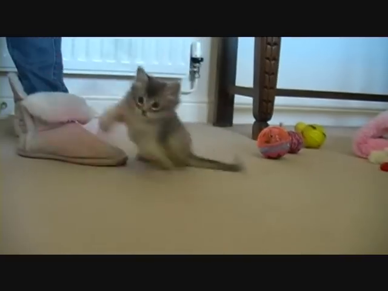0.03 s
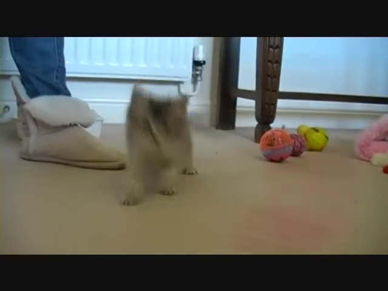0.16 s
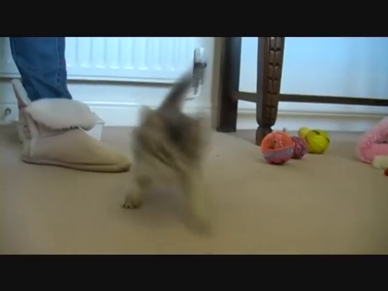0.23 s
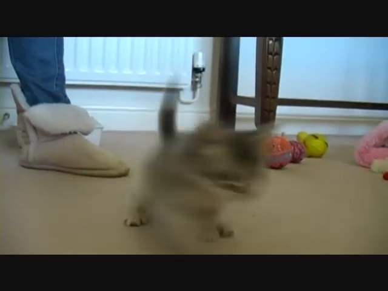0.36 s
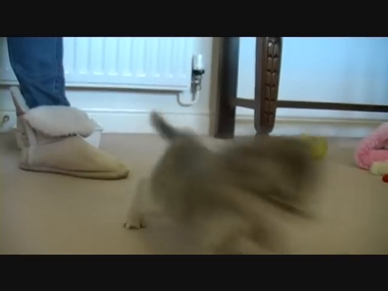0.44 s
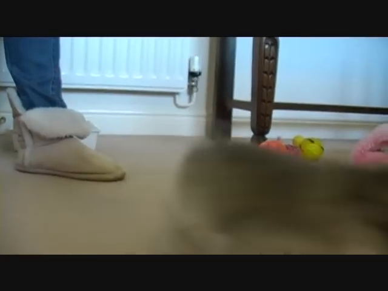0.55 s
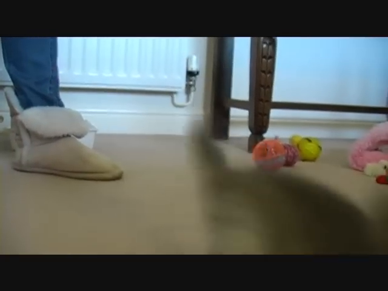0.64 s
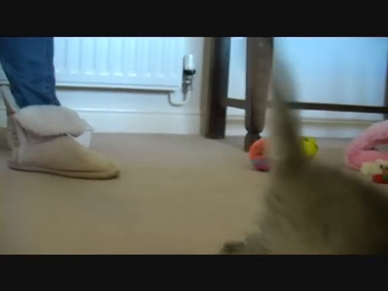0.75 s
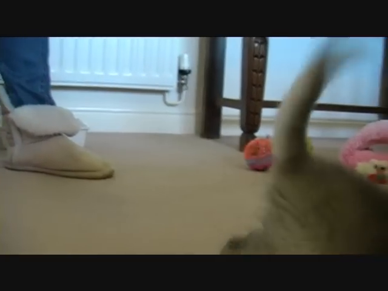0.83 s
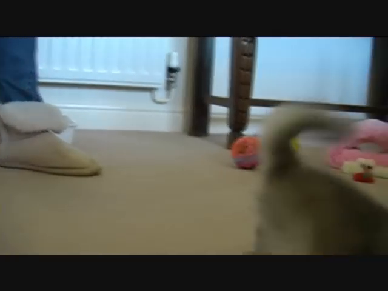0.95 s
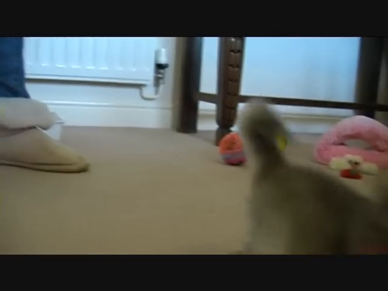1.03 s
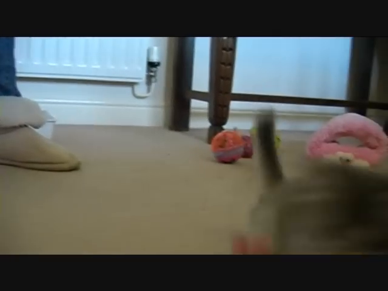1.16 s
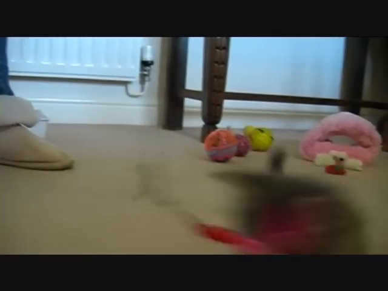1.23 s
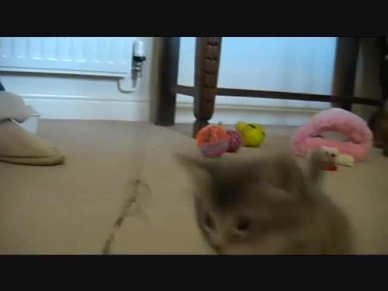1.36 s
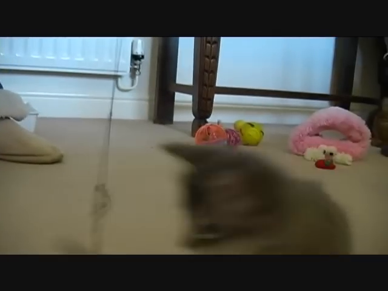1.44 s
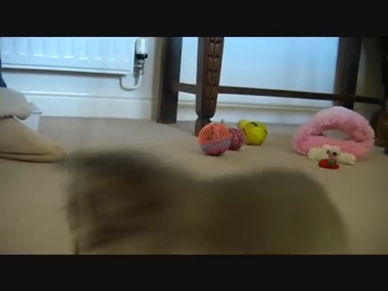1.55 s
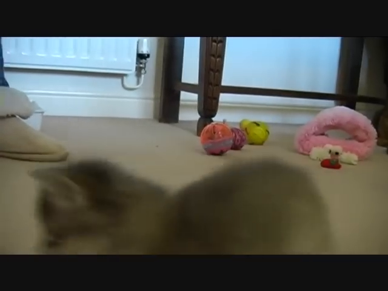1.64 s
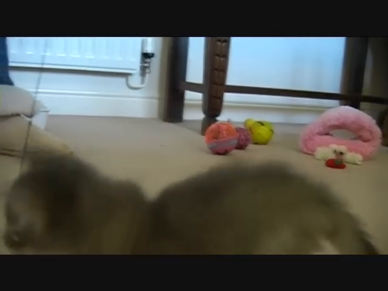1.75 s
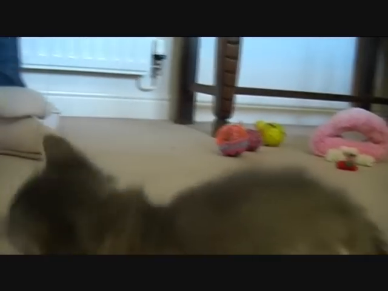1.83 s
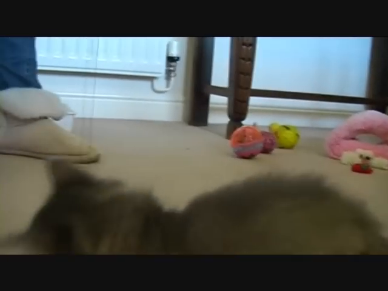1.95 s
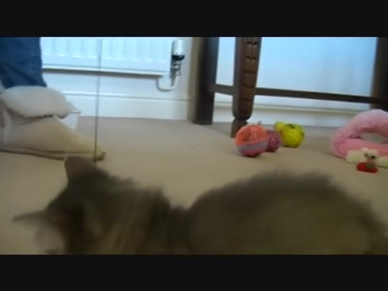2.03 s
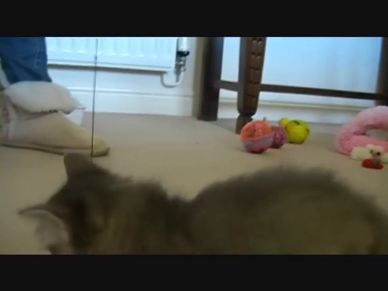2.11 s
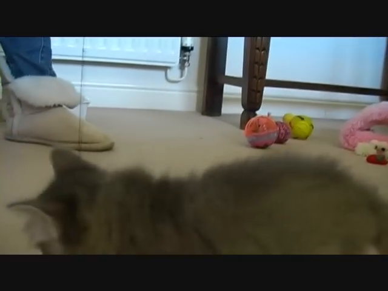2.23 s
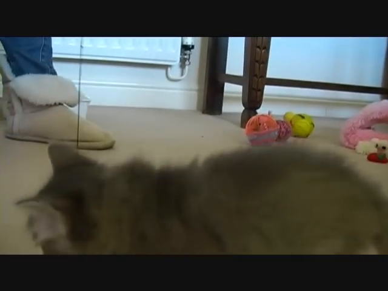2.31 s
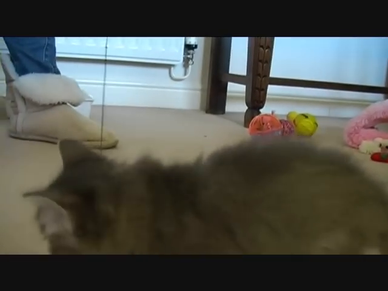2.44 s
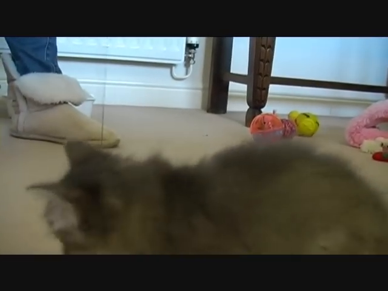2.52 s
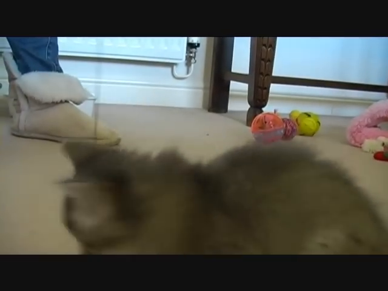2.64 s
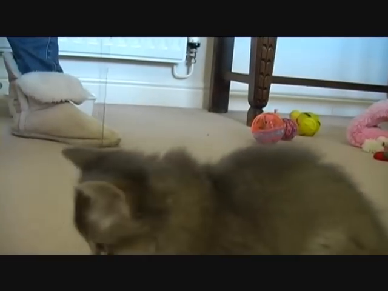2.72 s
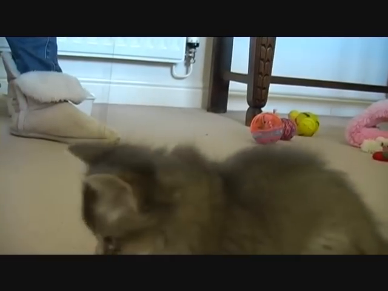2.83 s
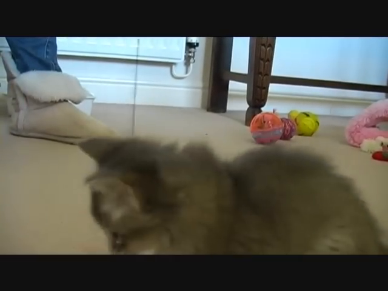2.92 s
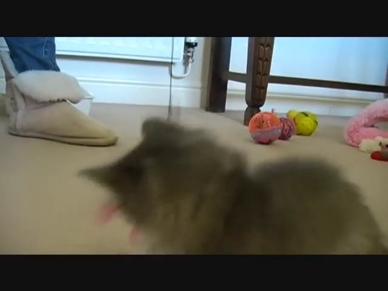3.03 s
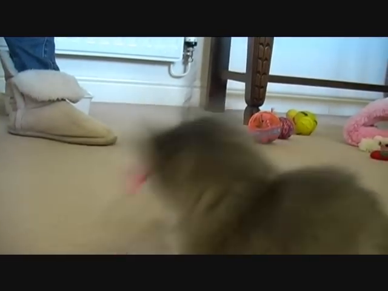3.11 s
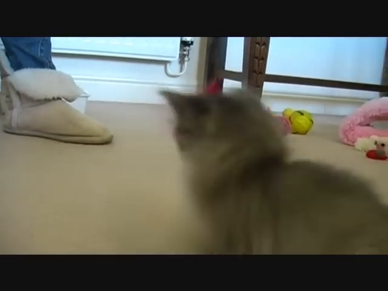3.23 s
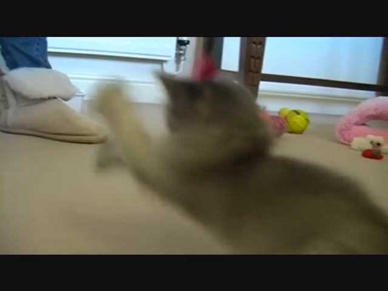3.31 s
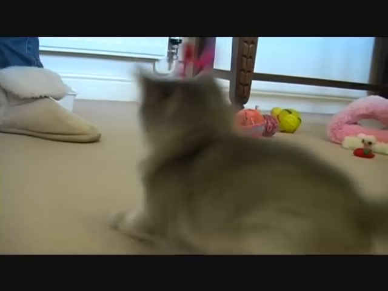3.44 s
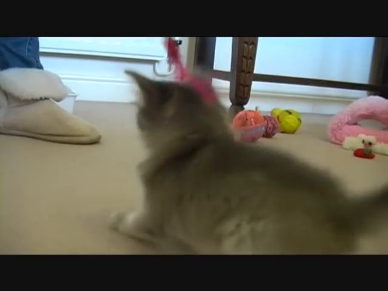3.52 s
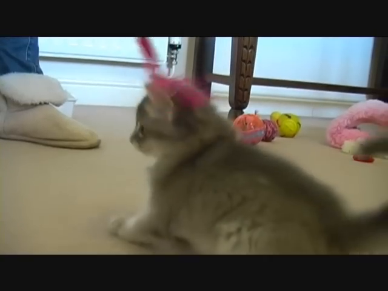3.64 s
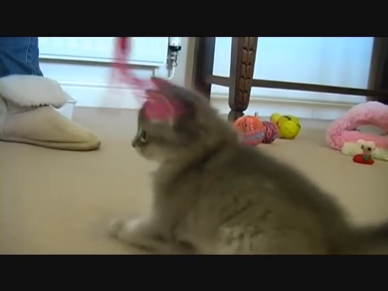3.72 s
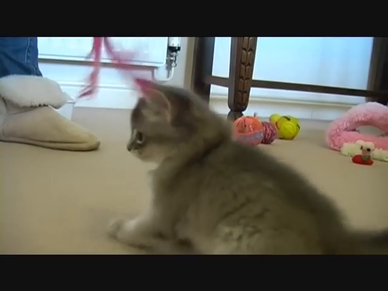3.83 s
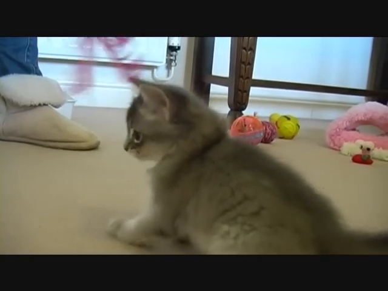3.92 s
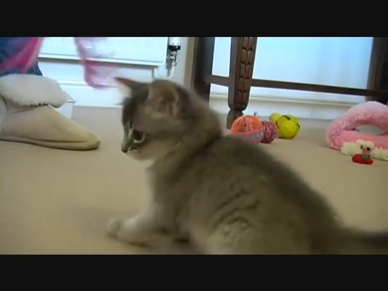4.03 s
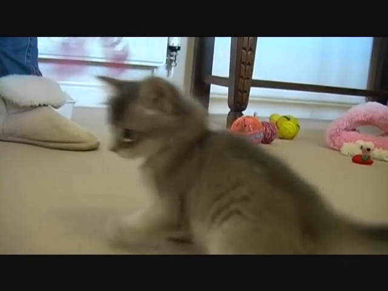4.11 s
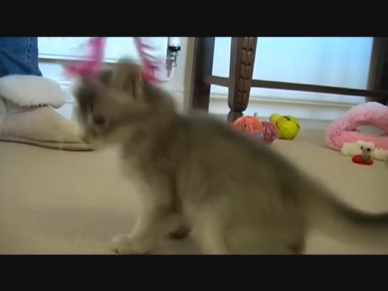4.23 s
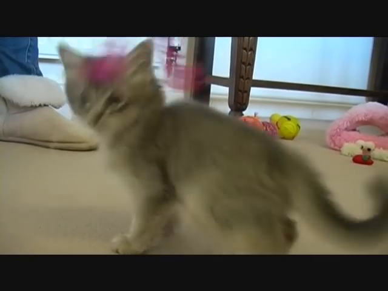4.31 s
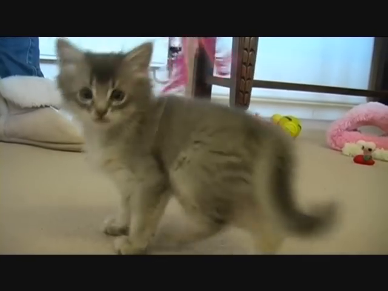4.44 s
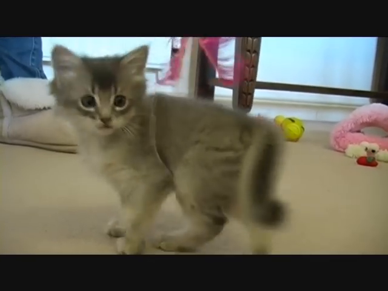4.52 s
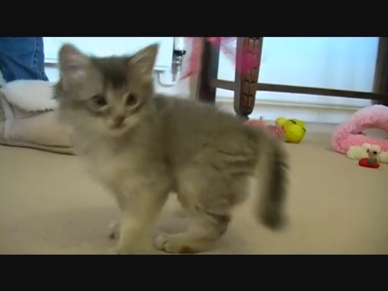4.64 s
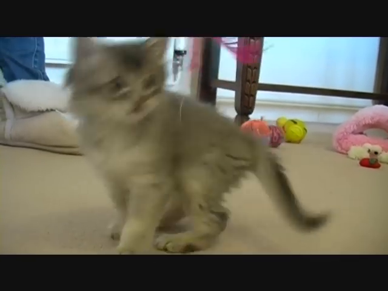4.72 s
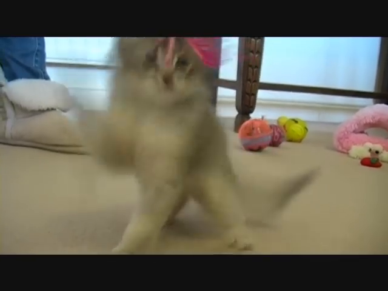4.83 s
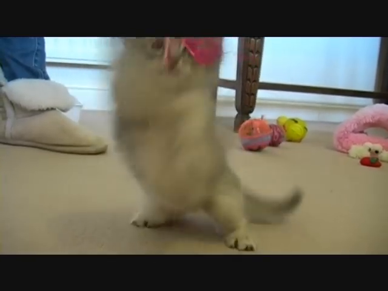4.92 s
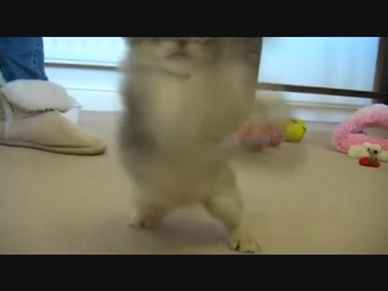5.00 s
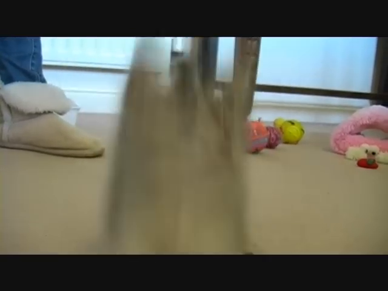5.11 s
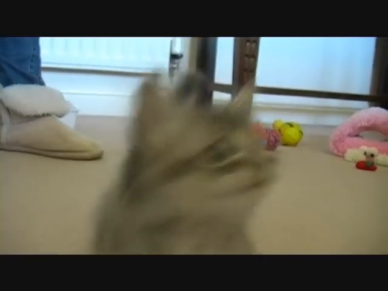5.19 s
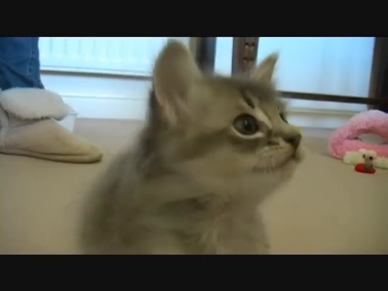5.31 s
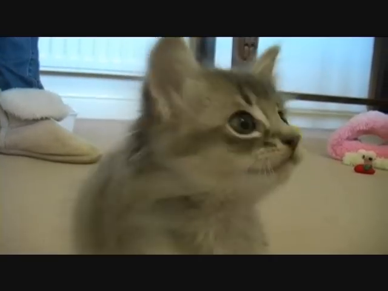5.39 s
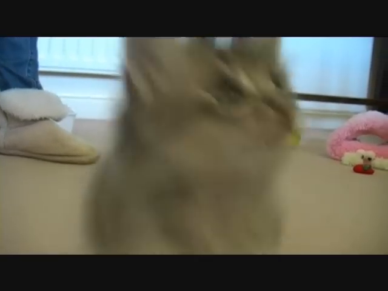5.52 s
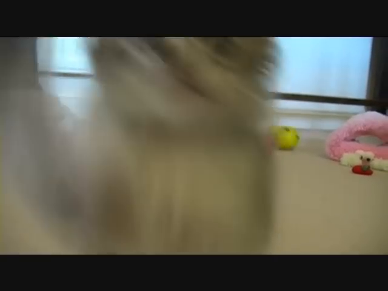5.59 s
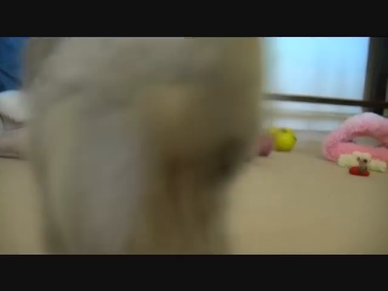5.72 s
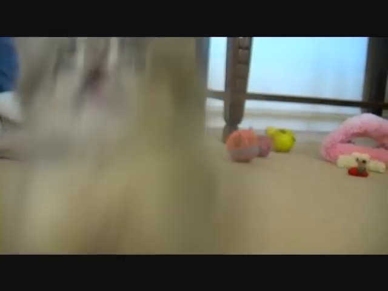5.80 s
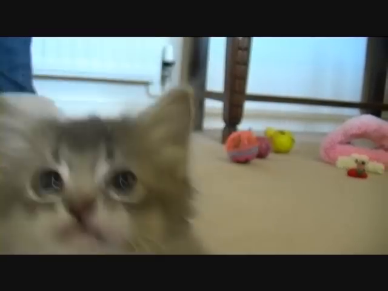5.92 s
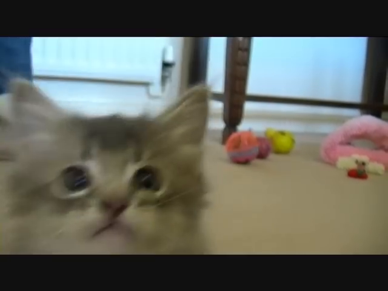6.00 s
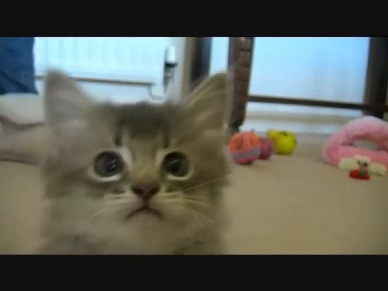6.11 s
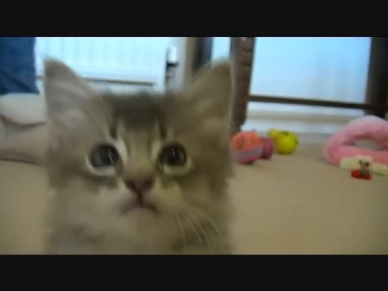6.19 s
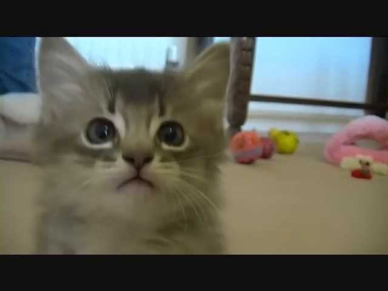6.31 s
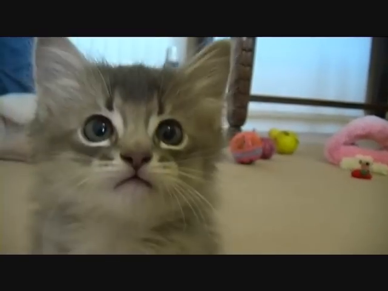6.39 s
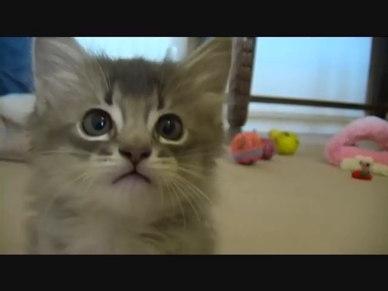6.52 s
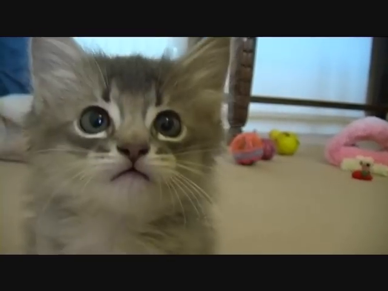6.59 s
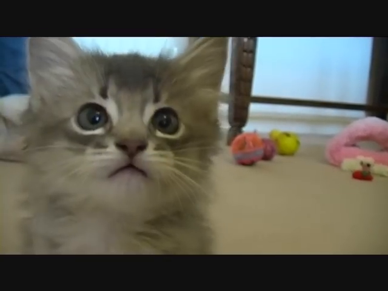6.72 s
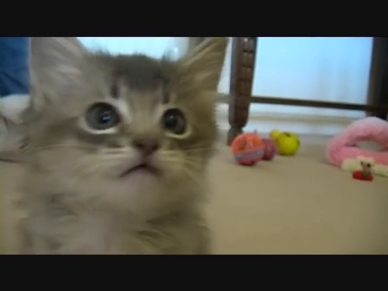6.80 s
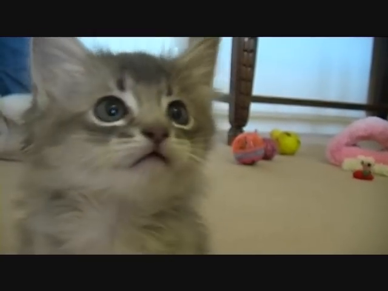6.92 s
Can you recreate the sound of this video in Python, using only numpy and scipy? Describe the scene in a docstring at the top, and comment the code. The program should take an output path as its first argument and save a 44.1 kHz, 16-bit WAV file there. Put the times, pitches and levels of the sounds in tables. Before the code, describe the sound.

A constant low hum around 150 Hz, with thin high whine, soft hiss and a dull room murmur, runs throughout, slightly wider than centre. A faint motor whirr fades just after 0.9 s. From 0.1 to 0.5 s a kitten's paws patter in soft, low thumps on carpeted boards; at 0.7-0.85 s a closer, knockier cluster lands with a short bright scuff. A thump at 1.0 s, light scuffles at 1.3 s, then a thud and rapid tiny ticks at 1.6-1.7 s. Fur rustles until about 2.3 s. It quietens, with a dull brush near 3.0 s and one firm thud at 3.5 s. Rustling returns at 4.0 s. A landing at 4.95 s, a crisp loud tick at 5.02 s, and the heaviest double thump at 5.2 s follow. Scuffs and ticks come at 5.6-5.9 s, a solid knock at 5.94 s, slight brushing to 6.2 s, then only hum and hiss.

```python
"""Kitten at play on carpet

A kitten pounces and scampers on a carpeted wooden floor, right in front of a camcorder standing on it.
Damped modes make the paws' thumps, and shaped noise the scuffs, the fur's rustle and the shaking.
Claws and a toy on a string tick as short rings and cracks; a small room echoes ticks and landings.
The camcorder's tape drum hums and whines in sine tones over soft filtered hiss and a low murmur.
"""
import sys
import numpy as np
from scipy import signal
from scipy.fft import rfft, irfft, next_fast_len
from scipy.io import wavfile
from scipy.ndimage import map_coordinates

SR = 44100
rng = np.random.default_rng(int(sys.argv[2]) if len(sys.argv) > 2 else 0)


def output_pcm(signal):
    """Save a mono or channel-first signal as 16-bit PCM at the path in sys.argv[1].

    Samples are clipped to [-1, 1] before scaling.
    """
    pcm = np.clip(np.atleast_2d(signal).T, -1, 1) * 32767
    wavfile.write(sys.argv[1], SR, np.round(pcm).astype(np.int16))


N = 306495  # length in samples


def amp(db):
    """Level law: decibels to amplitude gain."""
    return 10 ** (np.asarray(db) / 20)


def unit(x):
    """Normalisation: scale to rms 1."""
    return x / np.sqrt(np.mean(x ** 2) + 1e-20)


def along(points, hz):
    """Logarithmic pitch scale: interpolate (Hz, value) points on a log-frequency axis."""
    f, v = np.transpose(points)
    return np.interp(np.log(hz + 1), np.log(f), v)


def curve(rows):
    """Linear interpolation: (s, value) rows to one value a sample."""
    return np.interp(np.arange(N) / SR, *np.transpose(rows))


def wobble(rate):
    """Slow random modulation: a smooth curve through random knots, rate of them a second."""
    knots = rng.standard_normal(int(N * rate / SR) + 4)
    return map_coordinates(knots, [np.arange(N) * rate / SR])


def filtered(x, response):
    """Linear filtering: multiply the spectrum of x by a response of frequency."""
    m = next_fast_len(N + SR // 2)
    return irfft(rfft(x, m) * response(np.fft.rfftfreq(m, 1 / SR)), m)[..., :N]


def noise(spectrum, alike):
    """Partial coherence: stereo noise of rms 1 whose mid and side shares set the left-right likeness."""
    def mid_side_response(hz):
        turn = np.arccos(np.clip(along(alike, hz), -1, 1)) / 2
        return amp(along(spectrum, hz)) * [np.cos(turn), np.sin(turn)]

    mid, side = filtered(rng.standard_normal((2, N)), mid_side_response)
    return unit(np.array([mid + side, mid - side]))


def add(track, s, sound):
    """Superposition: mix a sound into a track from time s on."""
    part = track[..., round(s * SR):][..., :sound.shape[-1]]
    part += sound[..., :part.shape[-1]]


def swell(t, peak):
    """Impulse envelope: reaches 1 at the peak time and then dies away."""
    return t / peak * np.exp(1 - t / peak)


def held(start, end, rise, fade):
    """Sustained envelope: rises linearly at the start, holds, and decays exponentially after the end."""
    t = np.arange(N) / SR
    return np.clip((t - start) / rise, 0, 1) * np.exp(-np.maximum(t - end, 0) / fade)


def strokes(rows):
    """Power addition: gain of overlapping strokes, each (strongest at s, dB, length s), slow to die."""
    rise_share = 0.46  # a stroke's rise over its length
    power = np.zeros(N)
    for s, db, length in rows:
        start = max(s - 2 * length, 0)
        u = (start + np.arange(SR // 2) / SR - s) / length
        shape = np.exp(np.where(u < 0, -.5 * (u / rise_share) ** 2, -u))
        add(power, start, (amp(db) * shape) ** 2)
    return np.sqrt(power)


# Spectrum of the steady hiss. Each row: frequency in Hz, relative level in dB.
HISS_SPECTRUM = [(150, -31), (350, 5), (600, 1), (900, -0.5), (1500, -2), (2500, -4.5), (4000, -6.5),
                 (5500, -8), (6600, -9.5), (8000, -11), (11000, -11.5), (15800, -17.5)]
# Coherence of the hiss. Each row: frequency in Hz, left-right likeness from 0 to 1.
HISS_LIKENESS = [(400, 0), (3500, 0), (5000, 0.35), (8000, 0.43), (15000, 0.4)]
# Spectrum of the room's low murmur. Each row: frequency in Hz, relative level in dB.
MURMUR_SPECTRUM = [(20, -32), (50, -14), (80, -12.5), (102, 6), (135, -7), (185, -1.5), (240, -6.5),
                   (350, -4.5), (450, -9.5), (700, -72)]
# Coherence of the murmur. Each row: frequency in Hz, left-right likeness from 0 to 1.
MURMUR_LIKENESS = [(60, 1), (120, 1), (180, 1), (300, 0.73)]


def background():
    """Stationary noise: soft steady hiss and the low murmur of the room, slowly uneven in level."""
    hiss = amp(-46) * noise(HISS_SPECTRUM, HISS_LIKENESS)
    murmur_db = [[-50], [-51.5]] + 1.55 * wobble(3.844)
    murmur = amp(murmur_db) * noise(MURMUR_SPECTRUM, MURMUR_LIKENESS)
    return hiss + murmur


# Tape drum whine.
# Each row: multiple of the drum speed, left rms level in dB, right rms level in dB.
DRUM_WHINE = [(2, -60, -94), (22, -78, -69), (28, -74, -67), (30, -77, -76), (32, -73, -58),
              (34, -59.5, -59.5), (36, -78, -57), (38, -68, -72), (40, -80, -66), (42, -71, -72)]
# Other camcorder tones. Each row: frequency in Hz, left rms level in dB, right rms level in dB.
OTHER_TONES = [(5231, -69, -67), (15623, -90, -74)]
DRUM_HZ = 150  # turns a second
WHIRR_DB, WHIRR_STOP_S, WHIRR_FADE_S = -52.5, .9, 0.2  # rms level; the motor runs, then winds down


def camcorder():
    """Rotational harmonics: the drum rocks both ports in near antiphase and whines; a small motor whirrs."""
    t = np.arange(N) / SR
    turns = DRUM_HZ * t + .003 * wobble(3)  # the speed drifts slightly

    def waver():
        return amp(.7 * wobble(5))

    port_phase = np.array([[0], [2.8]])  # radians
    hum = amp([[-37.5], [-42]]) * waver() * np.sin(2 * np.pi * turns + port_phase)
    partials = [(round(k) * turns, left, right) for k, left, right in DRUM_WHINE]
    partials += [(hz * t, left, right) for hz, left, right in OTHER_TONES]
    whine = np.zeros((2, N))
    for cycles, left, right in partials:
        whine += amp([[left], [right]]) * waver() * np.sin(2 * np.pi * (cycles + rng.random()))
    running = amp(WHIRR_DB + 0.42 * wobble(22)) * held(0, WHIRR_STOP_S, 1 / SR, WHIRR_FADE_S)
    whirr_spectrum = [(3500, -12.5), (4600, -3.0), (5200, 0.5), (5700, -6), (7500, -34)]
    whirr = running * noise(whirr_spectrum, [(5000, 1.0)])
    return whirr + np.sqrt(2) * (hum + whine)  # a sine peaks at root 2 times its rms


# Bouts of play. Each row: start in seconds, end in seconds, rms level in dB.
PLAY_BOUTS = [(0, 2.33, -51), (4.03, 6.2, -53)]
# Spectrum of fur in the air. Each row: frequency in Hz, relative level in dB.
FUR_SPECTRUM = [(300, 9), (1500, 3.5), (4000, -4.5), (6500, 2), (10000, -7.5), (15800, -3.5)]


def rustle():
    """Friction noise: fur rustles faintly and unevenly as long as the kitten is on the move."""
    moving = np.zeros(N)
    for start, end, db in PLAY_BOUTS:
        moving += amp(db) * held(start, end, rise=0.061, fade=0.14)
    return moving * amp(0.3 * wobble(8.2)) * noise(FUR_SPECTRUM, [(1000, 0.13), (8000, 1.0)])


# The kitten's distance from the camcorder. Each row: time in seconds, distance in metres.
KITTEN_DISTANCE = [(0, 0.46), (.68, 0.35), (.77, 0.085), (1.6, 0.22), (3.5, .5), (5.2, 0.41), (5.72, 0.045),
                   (6.95, .5)]
# Spectrum of deep floor movement. Each row: frequency in Hz, relative level in dB.
SAG_SPECTRUM = [(20, -20), (45, -7), (60, -1), (72, 3.5), (90, -2), (130, -0.5), (250, -40.5)]
SHAKE_DB, SHAKE_LAG_S, SHAKE_S = -35.5, 0.018, 0.066  # against the boom at 1 m; delay and length
SHUFFLE_DB = -69.5  # shake from the kitten just shifting its weight, at 1 m
# both levels are before the left-right balance


def shaking():
    """Inverse-distance law: boards give under landings and shifts of weight and rock the camcorder."""
    landings = strokes((s + SHAKE_LAG_S, boom_db + SHAKE_DB, SHAKE_S) for s, boom_db, *_ in PAW_LANDINGS)
    strength = np.hypot(landings, amp(SHUFFLE_DB)) / curve(KITTEN_DISTANCE)
    balance = amp([[.7], [-.7]])
    return strength * noise(SAG_SPECTRUM, [(60, 0.91)]) * balance


# Decay of the room. Each row: frequency in Hz, time to fall by 60 dB in seconds.
ROOM_DECAY = [(100, 0.56), (200, 0.23), (500, 0.15), (2000, 0.25), (12000, 0.13)]


def echo(x, delay):
    """Diffuse reverberation: the room answers one short sound; long waves reach both ports alike."""
    hz, t, z = signal.stft(rng.standard_normal((2, SR // 2)), SR, nperseg=256)
    z = z * amp(-60 * t / along(ROOM_DECAY, hz)[:, None])
    apart = along([(150, 0.39), (700, 0.8)], hz)[:, None]
    ports = np.array([z[0] + apart * z[1], z[0] - apart * z[1]])
    tail = signal.istft(ports, SR, nperseg=256)[1]
    tail = np.pad(tail / np.linalg.norm(tail[0]), ((0, 0), (int(abs(delay) * SR), 0)))
    return signal.fftconvolve(x[None], tail, axes=1)


# Claws and toy ticking.
# Each row: time in seconds, level in dB before the band filter, ring frequency in Hz.
CLAW_AND_TOY_TICKS = [(0.0953, -22, 1590), (.6975, -27.5, 7000), (1.605, -20, 11500), (1.641, -27, 12000),
                      (1.6897, -22.5, 8800), (1.7013, -16, 8000), (1.731, -25.5, 10000),
                      (3.5677, -29.5, 6960), (4.382, -27.5, 7000), (5.0208, -4.5, 5600), (5.036, -20, 6300),
                      (5.431, -21, 1500), (5.7415, -16.5, 5130), (5.8764, -22.5, 2970)]


def ticks():
    """Impulsive contact: a hard point snaps in a crack, a ring of a few cycles and a little scatter."""
    t = np.arange(SR // 30) / SR
    out = np.zeros((2, N))
    for s, db, hz in CLAW_AND_TOY_TICKS:
        ring = amp(-60 * t / 0.0011) * np.sin(2 * np.pi * hz * t)
        crack_decay = 0.85 * amp(-60 * t / 0.0015) + 0.21 * amp(-60 * t / 0.02)
        crack = crack_decay * rng.standard_normal(len(t))
        edges = [min(0.7 * hz, 4200), min(1.2 * hz, 17000)]
        band = signal.butter(1, edges, "band", fs=SR, output="sos")
        tick = amp(db) * signal.sosfilt(band, ring + crack)
        add(out, s, np.array([tick, tick]))
        add(out, s, echo(amp(-29.0) * tick, delay=0.0032))
    return out


# Paws and fur dragged over the carpet. Each row: strongest moment in seconds, level in dB,
# length in seconds, brightness from 0 to 1.
CARPET_SCUFFS = [(.17, -44, 0.063, 0.4), (.708, -34.5, 0.019, 0.56), (.7505, -26, 0.0035, 1),
                 (.764, -33, 0.0071, 0.54), (1.259, -40, 0.037, 0.76), (1.34, -37.5, 0.018, 0.5),
                 (1.459, -43.5, 0.032, .9), (1.624, -36, 0.026, 0.42), (1.7, -44, 0.084, 0.5),
                 (2.25, -45.5, 0.12, 0.23), (2.962, -36.5, 0.046, 0.63), (3.075, -47.5, 0.097, 1),
                 (4.945, -35.5, 0.023, 0.63), (5.06, -47, 0.089, 0.78), (5.211, -37.5, 0.012, 0.54),
                 (5.621, -43, 0.037, .75), (5.737, -36.5, 0.017, 0.6), (6.0, -44, 0.043, 0.84),
                 (6.151, -43, .02, .7)]
# Spectrum of soft fur on pile. Each row: frequency in Hz, relative level in dB.
FUR_ON_PILE = [(100, -6), (250, -2), (380, 11), (550, 0.5), (800, 1.5), (1300, -3), (2500, -2), (6000, -16),
               (15000, -35)]
# Spectrum of claws through pile. Each row: frequency in Hz, relative level in dB.
CLAWS_IN_PILE = [(300, -16), (1500, -4), (3000, 1.5), (6000, 6), (9000, -1.5), (15000, -7.5)]
SLIP_DB, SLIP_GROWS = -38, .3  # a landing paw's slip under a 0 dB knock; dB per dB of knock
SLIP_LAG_S, SLIP_S, SLIP_BRIGHT = .006, 0.019, 0.37  # delay, length and brightness of that slip


def scuffs():
    """Friction noise: pile flicks past fur (dull) and claws (bright) in every drag and landing slip."""
    slips = [(s + SLIP_LAG_S, SLIP_DB + SLIP_GROWS * knock_db, SLIP_S, SLIP_BRIGHT)
             for s, _, _, knock_db, _ in PAW_LANDINGS]
    s, db, length, bright = np.transpose(list(CARPET_SCUFFS) + slips)
    likeness = [(500, 0.94), (3000, 0.62), (8000, 0.91)]
    brush = np.zeros((2, N))
    for share, spectrum in ((1 - bright, FUR_ON_PILE), (bright, CLAWS_IN_PILE)):
        level_db = db + 10 * np.log10(np.clip(share, .01, 1))  # brightness splits the power
        brush += strokes(zip(s, level_db, length)) * noise(spectrum, likeness)
    flicks = unit(amp(2.4 * wobble(2000) + 1.6 * wobble(70)))
    return brush * flicks


# Paw landings; levels are before the floor's stiffness and the left-right balance.
# Each row: start in seconds, boom level in dB, boom frequency in Hz, knock level in dB,
# knock frequency in Hz.
PAW_LANDINGS = [(0.09, -30.5, 154, -30, 750), (0.209, -27, 161, -34, 848), (0.252, -23, 181, -33, 507),
                (0.352, -17.5, 151, -38, 328), (0.418, -22.5, 143, -32, 335), (0.49, -18, 179, -32, 496),
                (0.681, -16, 159.5, -31, 610), (0.708, -34, 125, -31, 347), (0.745, -18, 126, -22, 320),
                (0.762, -17.5, 147, -13, 322), (0.79, -19.5, 127, -46, 320), (0.845, -29, 137, -31, 427),
                (1.011, -21, 136, -45, 517), (1.324, -31.5, 245, -39, 456), (1.351, -24.5, 134, -28.5, 316),
                (1.616, -24, 206, -22.5, 600), (3.5052, -15.5, 212, -19.5, 471),
                (4.496, -37.5, 155, -70, 549), (4.822, -30, 159, -60, 385), (4.958, -20, 166.7, -22.5, 304),
                (5.193, -13, 165, -13.5, 520), (5.21, -9.5, 233, -12, 475), (5.725, -32, 159, -35, 387),
                (5.815, -30, 144, -64, 366), (5.9411, -24.5, 169, -10, 356)]
# Long modes of the floor and room.
# Each row: frequency in Hz, relative level in dB, time to fall by 60 dB in seconds.
FLOOR_MODES = [(66.2, -24, 0.35), (115.3, -12, 0.35), (126.8, -8.5, 0.28), (153.76, -6, 0.4),
               (168, -14, 0.6), (194.6, -11, 0.28), (251.5, -16.5, 0.32), (293, -20, 0.16)]
# Spectrum of a soft pad pressed on pile. Each row: frequency in Hz, relative level in dB.
PAD_SPECTRUM = [(30, -30), (150, -29), (300, 5), (700, 13.5), (1200, 0.5), (2000, -16.5), (5000, -34)]
PAD_HZ = 673  # pitch of the pad's slap
PAT_DB, PAT_GROWS = -24, 0.53  # the pad's press under a 0 dB knock; dB it gains per dB of knock
RING_FROM_BOOM_DB, RING_FROM_KNOCK_DB = -3, -14.5  # how strongly each sets the floor ringing
STIFF_HZ, STIFF_WIDTH_HZ, STIFF_DB = 101, 13.6, -5.5  # it hardly moves between its two lowest modes


def thumps():
    """Modal excitation: a paw slaps pile, knocks the board, bends it in a boom and rings the floor."""
    t = np.arange(SR // 2) / SR
    near, far, press = np.zeros(N), np.zeros((2, N)), np.zeros(N)
    for s, boom_db, boom_hz, knock_db, knock_hz in PAW_LANDINGS:
        cycles = boom_hz * t  # the boom crests after about one cycle, whatever its pitch
        boom = -amp(boom_db) * swell(cycles, 1.27) ** 2 * np.sin(2 * np.pi * cycles)
        board = np.sin(2 * np.pi * knock_hz * t) + 0.15 * np.sin(2 * np.pi * 1.45 * knock_hz * t)
        knock = amp(knock_db) * swell(t, .0028) ** 2.06 * board
        pat_db = PAT_DB + PAT_GROWS * knock_db
        slap = amp(pat_db + 1.5) * swell(t, 0.0029) ** 2 * np.sin(2 * np.pi * PAD_HZ * t)
        ring = np.zeros(len(t))
        for hz, db, t60 in FLOOR_MODES:  # every landing stirs the modes in a new phase
            ring += amp(db - 60 * t / t60) * np.sin(2 * np.pi * (hz * t + rng.random()))
        weight = np.hypot(amp(boom_db + RING_FROM_BOOM_DB), amp(knock_db + RING_FROM_KNOCK_DB))
        ring_onset = 1 - np.exp(-t / 0.0079)
        add(near, s, boom + knock + slap + weight * ring * ring_onset)
        add(far, s, echo(amp(-10.5) * knock + amp(-3) * slap, delay=0.00904))
        add(press, s, amp(pat_db) * swell(t, 0.0039))

    def floor_response(hz):
        # the low thump reaches the left port a little sooner
        lead = np.exp(1j * 0.28 * np.minimum(hz / 160, 1.55) * np.array([[1], [-1]]))
        stiff = amp(STIFF_DB * np.exp(-.5 * ((hz - STIFF_HZ) / STIFF_WIDTH_HZ) ** 2))
        return lead * stiff

    direct = filtered(near, floor_response) * amp([[.7], [-.7]])  # and stronger on the left
    return direct + far + press * noise(PAD_SPECTRUM, [(500, 0.57)])


def scene():
    """Superposition: the kitten over the steady sounds."""
    steady = background() + camcorder()
    return steady + rustle() + shaking() + ticks() + scuffs() + thumps()


def record(dry):
    """Band limiting: the camcorder keeps nothing from 15.9 kHz up."""
    return filtered(dry, lambda hz: hz < 15900)


dry = scene()
out = record(dry)
output_pcm(out)
```